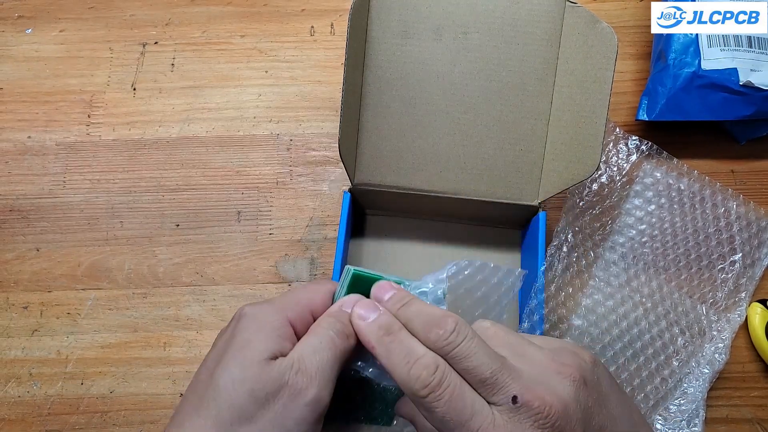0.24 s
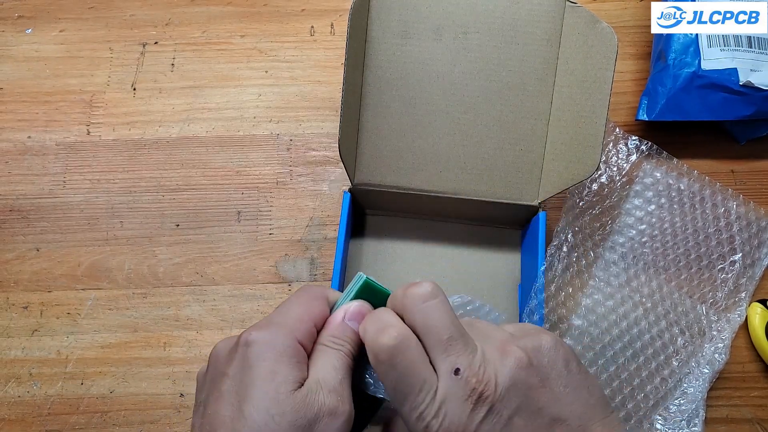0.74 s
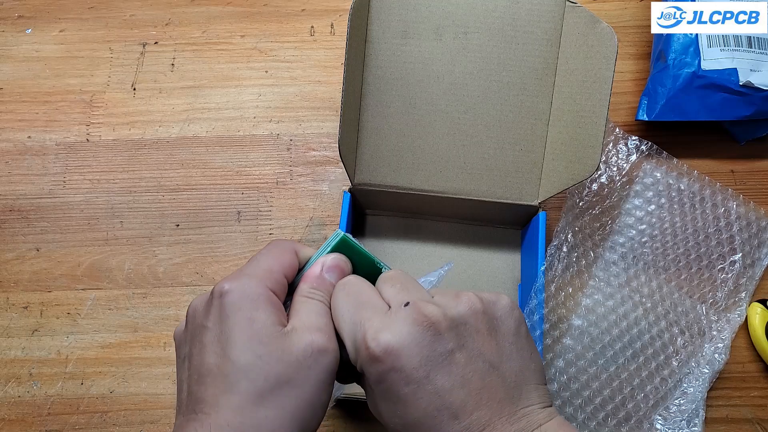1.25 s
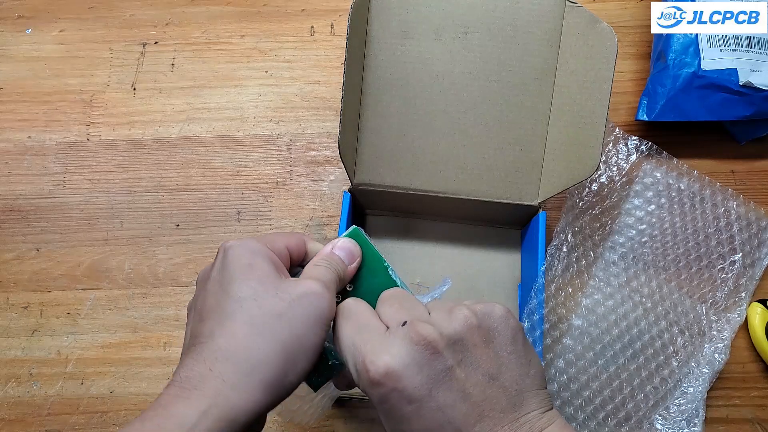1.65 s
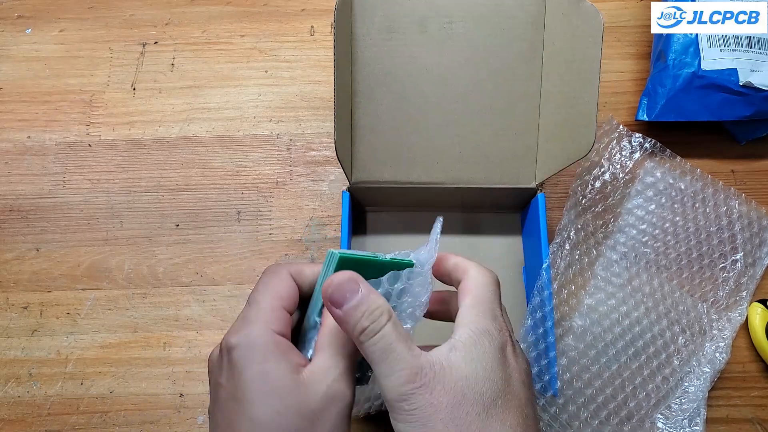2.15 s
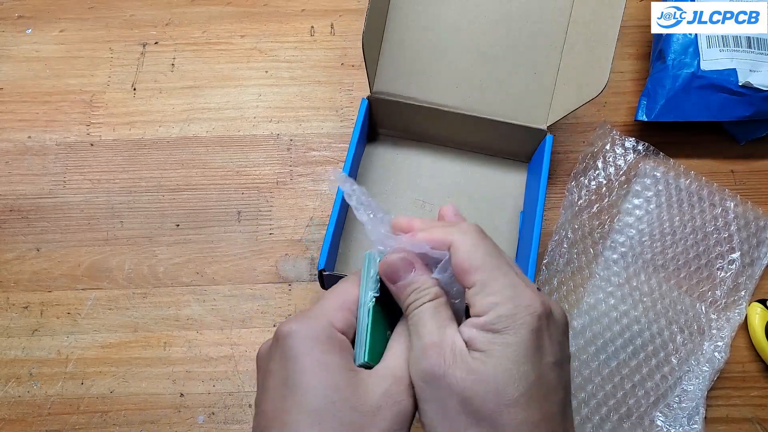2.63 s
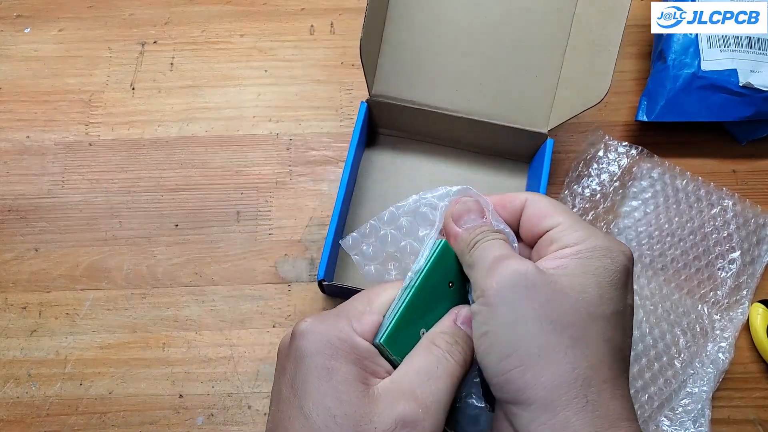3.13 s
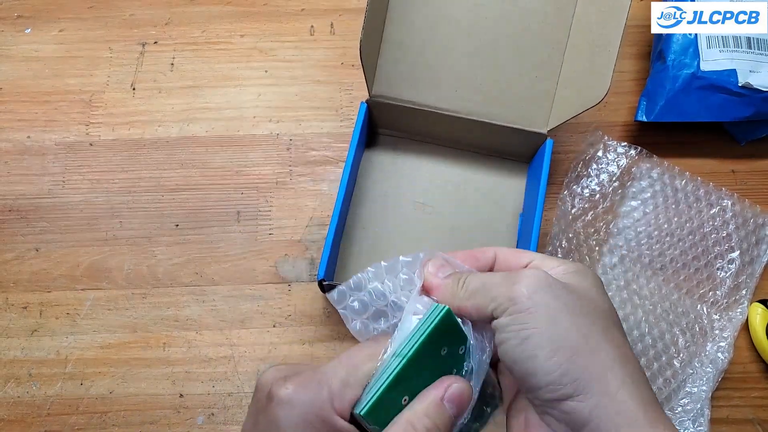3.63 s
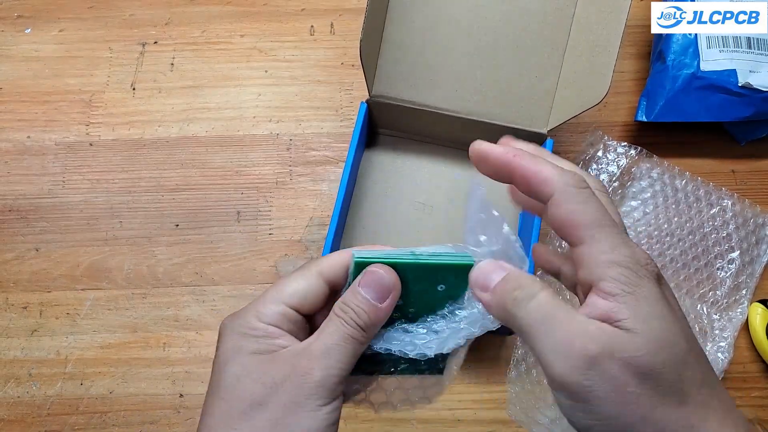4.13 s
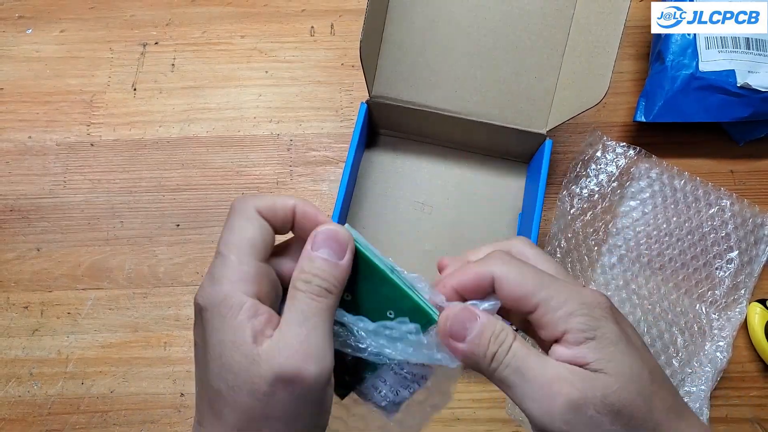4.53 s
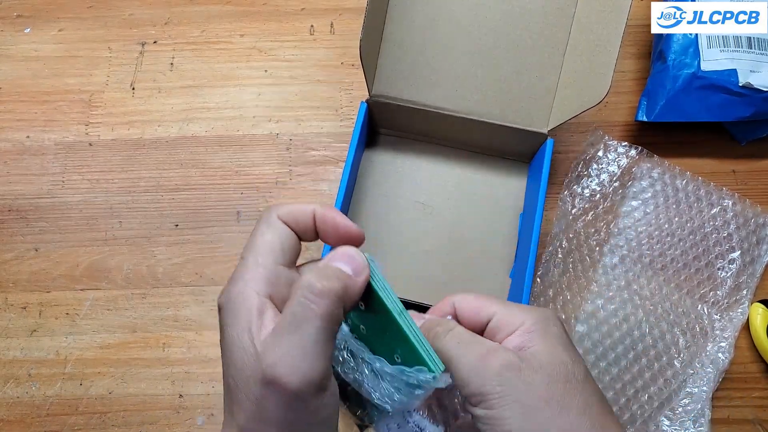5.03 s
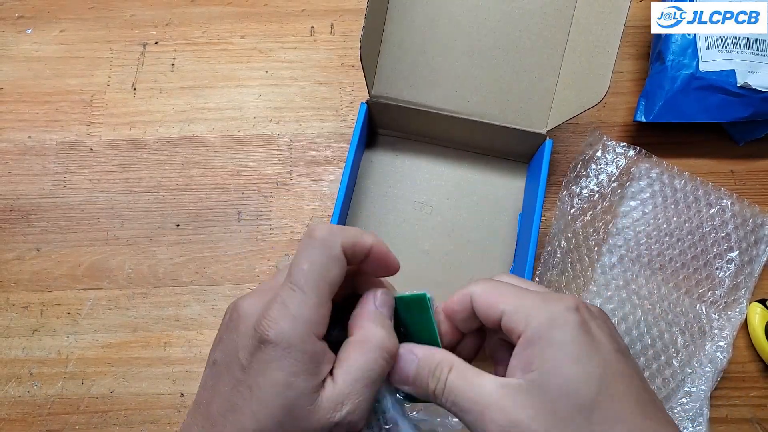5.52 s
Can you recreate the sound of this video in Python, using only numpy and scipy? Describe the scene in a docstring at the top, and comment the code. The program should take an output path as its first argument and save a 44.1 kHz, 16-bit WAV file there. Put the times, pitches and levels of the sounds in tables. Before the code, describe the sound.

Bubble wrap is handled close to the microphone, slightly to the left, as hands work a stack of circuit boards out of it. It starts with light, irregular crackling and rustling in short rubs. At about 0.9 and 1.0 seconds come the two loudest snaps, each with a crunch and a hollow finger bump. Faint squeaks follow around 1.7 seconds, then a crunch, a knock and a brief rough squeak near 2 seconds. The stack slips with a low judder between 2 and 2.5 seconds. Bright snaps cluster from 2.7 to 3.1 seconds and again around 3.8, with a faint rubbing tone. Lighter crinkling and soft bumps continue until a final burst of snaps, crunches and dull knocks at 5.5 to 5.7 seconds. The small room adds a short echo, and a faint low hum runs underneath throughout.

```python
"""Sharp snaps and a fine crackle of bubble wrap, as two hands work a stack of circuit boards out of it.
The film buckles and drags over the boards; fingers bump the stack; skin and film squeak.
An open cardboard box and the wooden table below answer within milliseconds,
the small room after them, over a low hum."""
import sys
import numpy as np
from scipy import signal
from scipy.fft import rfft, irfft
from scipy.io import wavfile
from scipy.ndimage import uniform_filter1d

SR = 44100
rng = np.random.default_rng(int(sys.argv[2]) if len(sys.argv) > 2 else 0)


def inscribe(sig):
    """Save sig as 16-bit PCM at rate SR to the path in sys.argv[1].

    A 1-D sig is mono; a 2-D sig holds one channel per row.
    Samples are clipped to [-1, 1] before scaling.
    """
    pcm = np.round(np.clip(np.atleast_2d(sig).T, -1, 1) * 32767)
    wavfile.write(sys.argv[1], SR, pcm.astype(np.int16))


N = 254456
TIME = np.arange(N) / SR
HZ = np.fft.rfftfreq(N, 1 / SR) + 1

# film rubbing over the boards, one row per finger move:
# (start [s], length [s], crackle [dB], fizz offset [dB], scrape offset [dB])
RUBS = [(0.0, 0.022, -40.5, -4, 0), (0.208, 0.048, -53, -6, -0.5), (0.456, .055, -50.5, -8, -1),
        (0.538, .028, -51, -21, -2), (0.612, .16, -49.5, -15, -6.5), (0.781, .06, -44.5, -7.5, -2),
        (0.842, 0.094, -40.5, -8.5, -3.5), (1.029, .04, -38.5, -4, -13), (1.101, 0.13, -52.5, -23, -0.5),
        (1.22, 0.052, -62, -13, -10), (1.42, 0.047, -53, -9, -5), (1.556, 0.068, -49.5, 0.5, -1),
        (1.617, .15, -49.5, -6.5, 1), (1.854, .03, -43.5, -7, -2.5), (1.891, 0.079, -36, -2.5, -1.5),
        (2.026, .03, -48.5, -24, 5), (2.102, 0.024, -46, -7.5, 4), (2.158, 0.033, -40.5, -7.5, 0.5),
        (2.254, .105, -44.5, -7, 0.5), (2.4, .035, -39.5, -5, 2.5), (2.449, .085, -48.5, -4, 4),
        (2.599, 0.1, -54.5, -10, -12), (2.707, 0.072, -42.5, -11, -14), (2.77, .068, -35.5, -8, -14),
        (2.866, .12, -41, -3.5, -4.5), (3.012, 0.075, -55.5, -3, 4), (3.086, 0.038, -46, -4, -0.5),
        (3.215, 0.097, -47.5, -9.5, 0.5), (3.292, 0.039, -48, -3, -11), (3.358, 0.12, -49, -12, -25),
        (3.481, 0.071, -55, -4, -4), (3.575, 0.078, -57, 0.5, -1.5), (3.687, 0.12, -45.5, -4.5, -15),
        (3.763, 0.057, -40.5, -7, -3), (3.901, 0.055, -52.5, -5, -13), (4.043, 0.053, -45, -3, -10),
        (4.14, 0.035, -41, -5, -7.5), (4.276, 0.045, -53, -5, -13), (4.335, 0.076, -49.5, -11, -0.5),
        (4.47, 0.064, -49.5, -6.5, -14), (4.594, 0.077, -47.5, -5, -14), (4.714, 0.062, -57.5, -5, -18),
        (4.833, 0.041, -51, -6, -11), (4.898, 0.074, -50.5, -7, 2), (5.063, 0.062, -59, -3, 0),
        (5.155, 0.041, -44.5, -4.5, 0.5), (5.226, 0.032, -44.5, -4, -2), (5.352, 0.021, -52, -8, 2),
        (5.539, 0.077, -50, -7.5, 3), (5.62, .075, -39, -11, 2)]
RUB_RELEASE_DB_PER_S = 267


def snaps():
    """Film buckles: a short pulse at the pitch of the patch, plus a bright crack of the crease."""
    # loudest buckles: (time [s], level [dB], patch pitch [Hz], Q [-], crack re patch [dB])
    buckles = [(0.0727, -36, 2970, 2.1, -7), (0.319, -43, 3720, 4, 7), (0.4104, -43.5, 3460, 3.5, -10),
               (0.4443, -34.5, 4360, 1.3, 2.5), (0.4635, -39, 4120, .9, -2), (0.56, -33, 2580, 0.41, -30),
               (0.8377, -30, 2180, 0.75, -20), (0.8714, -12.5, 1340, 1.08, -6.5),
               (0.924, -29, 2700, .7, 24), (1.0152, -34.5, 4160, .7, -30), (1.0258, -26.5, 1170, 0.82, 1),
               (1.0462, -9.2, 1230, 2.0, -7), (1.144, -33.5, 2870, 1.5, -2), (1.207, -38, 3300, 3.6, -28),
               (1.2356, -34.5, 3500, 0.91, 0), (1.4246, -36.5, 2130, 1.4, 3.5),
               (1.5248, -35, 2320, 0.43, 0.5), (1.5576, -34, 4360, 0.57, 9), (1.575, -35.5, 3430, 0.63, 14),
               (1.6836, -35.5, 3250, 2.7, -6), (1.8119, -37, 3120, 0.73, -30),
               (2.0253, -31, 1220, 0.87, -3.5), (2.1727, -34.5, 4280, 4.1, -28),
               (2.2538, -35.5, 3680, 4.2, -30), (2.2797, -34, 3580, 5, -21), (2.3908, -26, 3940, 1.35, -21),
               (2.5932, -37.5, 2850, 1.9, -30), (2.6405, -42.5, 2800, 1.1, 10),
               (2.7051, -18, 3880, 1.64, -14), (2.761, -28.5, 4560, 1.1, -4), (2.8706, -28, 4580, .55, 19),
               (2.8852, -23.5, 3330, 2.2, -2), (2.8865, -22, 3960, 2.3, 7), (2.95, -26.5, 4250, 0.55, -16),
               (3.0805, -19.5, 2480, 1.2, -11), (3.112, -29, 1600, 0.7, -28),
               (3.1917, -30, 2800, 1.35, -16), (3.2201, -38, 1980, .9, -30), (3.2514, -34.5, 1830, .5, -2),
               (3.286, -36, 3270, 1, -5), (3.3225, -29.5, 1500, 2.2, -2), (3.358, -30.5, 4420, 2, -30),
               (3.4017, -37.5, 3160, 0.87, -30), (3.458, -36, 5200, 0.69, -21),
               (3.5787, -33.5, 4200, 1.8, -33), (3.6383, -34.5, 3240, 1, -27),
               (3.688, -29.5, 5100, 1.3, -18), (3.694, -31.5, 3750, 1.9, -6),
               (3.8027, -20.5, 2100, 0.54, -12), (3.8226, -19, 3960, 0.43, -30),
               (3.8358, -17, 7400, 1.7, 1), (3.9124, -34.5, 4200, 0.76, 1), (3.9684, -38, 3470, 1.4, 15),
               (3.993, -32.5, 3260, 5.8, 2), (4.0042, -24.5, 5950, 2, -4.5), (4.1357, -37, 4650, 1.2, 2),
               (4.1516, -26.5, 2730, 2.2, -2), (4.3352, -34.5, 3620, .65, -6), (4.3567, -35, 2930, 1.1, -4),
               (4.398, -29.5, 2770, .6, -23), (4.4891, -34, 3320, 0.52, -2), (4.5988, -36, 5800, 2.4, -1),
               (4.66, -36, 5740, 2.6, -16), (4.761, -38.5, 4030, 1.3, -24), (4.8286, -39.5, 5600, 1.4, -11),
               (5.0023, -41.5, 3750, 1.8, -4), (4.896, -27, 4200, 2.5, -0.5),
               (4.933, -34.5, 2140, 1.2, -31), (5.1063, -30, 4900, 0.49, -20),
               (5.195, -28.5, 990, 0.33, -2.5), (5.5305, -35, 850, .6, -8), (5.5434, -30, 1350, .75, -30),
               (5.5551, -24.5, 1430, 1.2, -18), (5.6272, -26, 700, 0.61, -6),
               (5.6362, -22.5, 1440, 0.7, -5), (5.6707, -19, 3000, 0.14, -14),
               (5.68, -18.5, 1480, 0.54, -1)]
    out, t = np.zeros((2, N)), TIME[:SR // 100]
    for s, db, hz, q, crack_db in buckles + small_snaps():
        crack = amp(crack_db) * ring(rng.uniform(8000, 12400), 0.73, 0.61)
        # strong buckles go at once; weak ones stutter for a few ms
        stutter = np.clip((-27 - db) / 26, 0.01, 0.42)
        slips = clicks(len(t), per_s=6000, spread_db=0.63) * np.exp(-t / 0.0019)
        slips *= np.sqrt(stutter) / np.linalg.norm(slips)
        slips[0] = np.sqrt(1 - stutter)
        pulse = signal.fftconvolve(ring(hz, q, 0.45 * q) + crack, slips)
        pulse *= np.sqrt(SR / 1000) / np.linalg.norm(pulse)  # energy of 1 ms at rms 1
        add(out, s, placed(amp(db) * pulse, left_db=3.5 + 1.5 * rng.standard_normal()))
    return out


def small_snaps(per_s=26, max_per_rub=5, after_s=0.05, usual_rub_db=-48.5):
    """Rows for snaps(): lesser buckles at random in and just after each rub, louder in a hard one."""
    rows = []
    for s, length_s, db, _, _ in RUBS:
        span_s = length_s + after_s
        draws = zip(rng.random((max_per_rub, 2)), rng.standard_normal((max_per_rub, 2)))
        for (when, chance), (size, patch) in draws:
            if chance < per_s * span_s / max_per_rub:
                pull_db = db - RUB_RELEASE_DB_PER_S * max(when * span_s - length_s, 0) - usual_rub_db
                level_db = -40 + 0.6 * pull_db + 2 * size
                patch_hz = 3620 * 2 ** (0.46 * patch)
                rows.append((s + when * span_s, level_db, patch_hz, 1.9, -12))
    return rows


def crunches():
    """A fold collapses in a dense run of small buckles, scattered left and right."""
    # collapsing folds: (start [s], length [s], level [dB], pitch [Hz])
    folds = [(0.838, .006, -33, 2550), (1.0468, .008, -24.5, 2600), (1.896, .007, -38.5, 1630),
             (1.927, 0.012, -34, 4100), (1.955, 0.0072, -34.5, 1650), (2.411, 0.0098, -38, 1190),
             (2.882, 0.0079, -36.5, 5950), (3.318, 0.0053, -35, 2200), (3.8, 0.0037, -30, 3000),
             (5.632, 0.011, -31, 1750), (5.6695, 0.013, -26, 2800)]
    out = np.zeros((2, N))
    for s, length_s, db, hz in folds:
        count = int(length_s * SR)
        buckle = ring(hz, 1.0, 0.1) + amp(-19.5) * ring(9600, 0.82, 0.39)
        for left_db in (8, -3):
            slips = clicks(count, per_s=5000, spread_db=5.3) * signal.windows.tukey(count, 0.3)
            run = unit_rms(slips) / np.sqrt(2)
            add(out, s, placed(amp(db) * signal.fftconvolve(run, buckle), left_db))
    return out


def sliding(grip_s=0.26):
    """Stick-slip of the film: crackle, finer fizz, and a dull scrape through the boards."""
    # spectra of the three layers: (frequency [Hz], relative level [dB])
    crackle_spectrum = [(500, -20.5), (1200, -4.5), (2200, 0), (3300, 4.5), (5500, -1), (7500, 4.5),
                        (11000, -22.5), (16000, -41)]
    fizz_spectrum = [(2000, -77.5), (5500, -49), (7500, 8), (9500, 9), (12000, 11.5), (16000, 10)]
    scrape_spectrum = [(100, -17.5), (250, 0.5), (480, 1.5), (640, -2), (820, 2), (1000, 0), (1400, 0),
                       (2000, 3.5), (3200, -29), (8000, -42.5)]
    s, length_s, db, fizz_db, scrape_db = np.transpose(RUBS)

    def pull(rub_db, creep_db):
        """Envelope of the rubs over the faint creep of the gripped film."""
        rubs = strokes(s, length_s, rub_db, attack_s=0.0057, sag_db_per_s=16,
                       release_db_per_s=RUB_RELEASE_DB_PER_S)
        return np.hypot(rubs, amp(creep_db) * (TIME > grip_s))

    effort = pull(db, creep_db=-61.5)
    fizz_effort = pull(db + fizz_db, creep_db=-65.5)
    scrape_effort = pull(db + scrape_db, creep_db=-68.5)
    rustle = grains(per_s=5000, spread_db=3, low_hz=764, high_hz=14200, q=0.82)
    ticks = grains(per_s=450, spread_db=3.5, low_hz=1280, high_hz=13400, q=3.3)
    # slow pull: separate pitched ticks; fast pull: dense rustle
    speed = np.clip((20 * np.log10(effort + 1e-9) + 66.5) / 34, 0.2, 0.9)
    slips = np.sqrt(speed) * rustle + np.sqrt(1 - speed) * ticks
    crackle = amp(-3) * effort * steadied(colour(slips, crackle_spectrum), window_s=0.054)
    fizz = amp(-1) * fizz_effort * steadied(colour(slips, fizz_spectrum), window_s=0.049)
    scrape = amp(-4.5) * scrape_effort * steadied(colour(slips, scrape_spectrum), window_s=0.045)
    return crackle + fizz + scrape


def grains(per_s, spread_db, low_hz, high_hz, q, patches=24):
    """Tiny buckles on patches of many sizes and places, each ringing at its own pitch."""
    out = np.zeros((2, N))
    for hz in np.geomspace(low_hz, high_hz, patches):
        patch = placed(ring(hz, q, q / 4), left_db=2 + 2 * rng.standard_normal())
        slips = clicks(N, per_s / patches, spread_db)
        out += signal.oaconvolve(slips[None], patch, axes=1)[:, :N]
    return unit_rms(out)


def ring(hz, q, skirt_q, size=1024):
    """Heavily damped patch of film: a few cycles, energy 1."""
    bin_hz = np.fft.rfftfreq(size, 1 / SR) + 1
    detune = bin_hz / hz - hz / bin_hz
    response = 1 / ((1 + 1j * q * detune) * (1 + 1j * skirt_q * detune))
    pulse = np.roll(irfft(response), 10)
    return pulse / np.linalg.norm(pulse)


def bumps(t60_cycles=9.2, attack_s=0.00058):
    """Fingers bump the stack and its air cushions: hollow, damped knocks."""
    # knocks: (time [s], level [dB], pitch [Hz])
    knocks = [(0.8718, -23.5, 313), (1.047, -29, 268), (1.957, -24.5, 371), (2.122, -35.5, 267),
              (2.325, -43, 220), (2.418, -32, 227), (4.08, -38, 453), (4.336, -38.5, 434),
              (4.399, -36.5, 380), (5.194, -40.5, 303), (5.554, -28.5, 450), (5.6263, -24, 393),
              (5.672, -23, 251), (5.678, -31, 98), (5.678, -17.5, 458)]
    out, t = np.zeros(N), TIME[:SR // 4]
    for s, db, hz in knocks:
        envelope = amp(db - 60 * t * hz / t60_cycles) * (1 - np.exp(-t / attack_s))
        add(out, s, envelope * np.sin(2 * np.pi * hz * t))
    return panned(out, left_db=4.5)


def turning():
    """The stack slips as it turns in the grip: low judder, with knocking above it."""
    # turns of the stack: (start [s], length [s], judder [dB], knocking [dB])
    turns = [(2.021, 0.041, -54, -43), (2.133, .25, -44.5, -49), (2.409, 0.036, -36, -36.5),
             (2.447, 0.087, -35.5, -48), (2.887, 0.086, -44.5, -52)]
    # spectra of the two layers: (frequency [Hz], relative level [dB])
    judder_spectrum = [(25, -22), (50, 1), (75, 0.5), (105, 8.5), (135, -1), (200, -25), (500, -50),
                       (2000, -83)]
    knock_spectrum = [(80, -17), (170, -6.5), (250, 2), (400, -14.5), (600, -10), (850, -8), (1200, -21.5),
                      (4000, -66)]
    s, length_s, judder_db, knock_db = np.transpose(turns)
    slips = clicks(N, per_s=600, spread_db=0.94)[None]
    out = np.zeros((2, N))
    for db, spectrum, left_db in ((judder_db, judder_spectrum, 1.5), (knock_db, knock_spectrum, 4.5)):
        effort = strokes(s, length_s, db, attack_s=0.018, sag_db_per_s=9, release_db_per_s=174)
        out += panned(effort * steadied(colour(slips, spectrum), window_s=0.039), left_db)
    return out


def squeaks():
    """Short rough squeaks of skin on film, and faint, smoother hoots."""
    # both: (start [s], length [s], level [dB], start pitch [Hz], end/start pitch [-])
    squeak_rows = [(1.63, 0.038, -61, 735, 1.12), (1.635, 0.07, -58, 960, 1.24),
                   (1.68, 0.036, -57, 1194, 1.14), (1.705, 0.069, -59.5, 887, 0.98),
                   (2.03, 0.035, -42, 287, 0.776), (5.374, 0.022, -43.5, 850, 0.88)]
    hoot_rows = [(.39, 0.19, -66, 575, 0.88), (3.52, 0.12, -60, 572, 0.9),
                 (3.735, 0.1215, -51, 558.3, 0.94)]
    out = tones(squeak_rows, waver=0.085, rough=0.6) + tones(hoot_rows, waver=0.031, rough=0.37)
    return panned(out, left_db=5.7)


def tones(rows, waver, rough):
    """Swelling, gliding tones, unsteady in pitch and level."""
    out = np.zeros(N)
    for s, length_s, db, hz, glide in rows:
        count = int(length_s * SR)
        drift, flutter = unit_rms(uniform_filter1d(rng.standard_normal((2, count)), size=80))
        pitch_hz = hz * np.geomspace(1, glide, count) * (1 + waver * drift)
        tone = np.sin(2 * np.pi * np.cumsum(pitch_hz) / SR) * (1 + rough * flutter)
        add(out, s, amp(db) * unit_rms(tone * np.hanning(count)))
    return out


def reflections(x, t60_points, start_s, alike_hz, block):
    """Echo paths that change from block to block as the hands move."""
    out, padded = np.zeros((2, N + block)), np.pad(x, ((0, 0), (block, 2 * block)))
    window = signal.windows.cosine(2 * block)
    for start in range(0, N + block, block):
        response = echo_tail(t60_points, start_s, alike_hz, size=3 * block)
        piece = padded[:, start:start + 2 * block] * window
        add(out, start / SR, signal.fftconvolve(piece, response, axes=1))
    return out[:, block:]


def echo_tail(t60_points, start_s, alike_hz, size):
    """Scattered echoes of energy 1; long waves reach both microphones alike."""
    taps = rng.choice([-1., 1.], (2, size)) * (rng.random((2, size)) < 0.5) * (TIME[:size] > start_s)
    hz, frame_s, spectra = signal.stft(taps, SR, nperseg=128)
    coherence = 1 / (1 + (hz[:, None] / alike_hz) ** 2)
    spectra[1] = coherence * spectra[0] + np.sqrt(1 - coherence ** 2) * spectra[1]
    decay = amp(-60 * frame_s / curve_at(t60_points, hz)[:, None])
    tail = signal.istft(spectra * decay, SR, nperseg=128)[1]
    return tail / np.linalg.norm(tail, axis=1, keepdims=True)


def room_hum(level_db=-53.5, rise_db=6, rise_s=0.78):
    """Low hum, alike at both microphones, with a faint diffuse hiss; both come up at the start."""
    # room noise: (frequency [Hz], relative level [dB])
    spectrum = [(20, -28), (38, -10.5), (55, -2), (72, -2.5), (110, -12), (170, -17), (300, -23),
                (700, -30.5), (2000, -36.5), (6000, -37.5), (16000, -53)]
    shared, own = rng.standard_normal(N), rng.standard_normal((2, N))
    coherence = curve_at([(100, 0.96), (600, 0.17), (3000, 0.2)], HZ)
    noise = irfft(rfft(shared) * np.sqrt(coherence) + rfft(own) * np.sqrt(1 - coherence), N)
    envelope = amp(level_db - rise_db * np.maximum(1 - TIME / rise_s, 0))
    return envelope * unit_rms(colour(noise, spectrum))


def strokes(starts_s, lengths_s, levels_db, attack_s, sag_db_per_s, release_db_per_s):
    """Envelope of hand moves: each takes hold quickly, slackens, then lets go."""
    power = np.zeros(N)
    for s, length_s, db in zip(starts_s, lengths_s, levels_db):
        t = TIME[:int((length_s + 0.5) * SR)]
        fall_db = sag_db_per_s * t + release_db_per_s * np.maximum(t - length_s, 0)
        add(power, s, (np.minimum(t / attack_s, 1) * amp(db - fall_db)) ** 2)
    return np.sqrt(power)


def clicks(count, per_s, spread_db):
    """Random slips of either sign, most small, a few large."""
    size = amp(spread_db * np.minimum(rng.exponential(1, count), 3.5))
    return size * rng.choice([-1, 1], count) * (rng.random(count) < per_s / SR)


def placed(pulse, left_db):
    """Pans a buckle; the hands are to the left, so the right microphone lags by up to 60 us."""
    size = len(pulse)
    delay = np.exp(-2j * np.pi * np.fft.rfftfreq(size, 1 / SR) * rng.uniform(0, 6e-5))
    return panned(np.array([pulse, irfft(rfft(pulse) * delay, size)]), left_db)


def panned(x, left_db):
    """Constant-power pan, left over right by left_db."""
    return x * unit_rms(amp([[left_db / 2], [-left_db / 2]]))


def colour(x, points):
    """Causal filter: clicks keep their sharp front."""
    log_gain = np.log(amp(curve_at(points, abs(np.fft.fftfreq(N, 1 / SR)))))
    response = np.exp(np.conj(signal.hilbert(log_gain)))
    return irfft(rfft(x) * response[:len(HZ)], N)


def steadied(x, window_s):
    """Holds short-time power near 1, leaving the grain."""
    power = uniform_filter1d((x ** 2).mean(0), int(window_s * SR))
    return x / np.sqrt(abs(power) + 0.11 * power.mean())


def curve_at(points, hz):
    """Interpolates on a log-frequency axis."""
    point_hz, value = np.transpose(points)
    return np.interp(np.log(hz + 1), np.log(point_hz), value)


def add(mix, s, sound):
    """Mixes a sound in at time s."""
    part = mix[..., max(round(s * SR), 0):][..., :sound.shape[-1]]
    part += sound[..., :part.shape[-1]]


def amp(db):
    """Decibels to gain."""
    return 10 ** (np.asarray(db) / 20)


def unit_rms(x):
    """Scales to rms 1."""
    return x / np.sqrt(np.mean(x ** 2) + 1e-20)


def scene():
    """Film and fingers, the quick answer of table and box, then the room."""
    # decay of table and box, and of the room: (frequency [Hz], t60 [s])
    table_t60 = [(300, 0.067), (900, 0.012), (1700, 0.056), (4000, 0.059), (12000, 0.051)]
    room_t60 = [(150, 0.93), (1000, 0.25), (3500, 0.35), (8000, 0.21), (16000, 0.3)]
    film = sliding() + crunches() + snaps()
    handling = bumps() + turning() + squeaks()
    thrown = film + amp(-4.5) * handling  # long waves bend round the box and reflect less
    table = amp(-2) * reflections(thrown, table_t60, start_s=0.0007, alike_hz=1470, block=1024)
    room = amp(-10.5) * reflections(thrown, room_t60, start_s=0.005, alike_hz=900, block=4096)
    return film + handling + table + room + room_hum()


def record(dry, ceiling=0.95, edge_hz=16100):
    """Microphone colour, soft overload on the hardest snaps, band limit."""
    # microphone response: (frequency [Hz], gain [dB])
    microphone = [(20, -12.5), (38, -1), (600, -2.5), (1100, -1), (3000, -1.5), (5900, 2), (7400, -4),
                  (9500, 0), (13000, -0.5), (16000, -4)]
    squashed = ceiling * np.tanh(colour(dry, microphone) / ceiling)
    lowpass = signal.firwin(401, edge_hz, window=("kaiser", 8), fs=SR)
    return signal.oaconvolve(squashed, lowpass[None], "same", axes=1)


dry = scene()
out = record(dry)
inscribe(out)
```